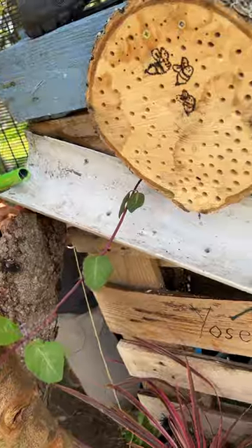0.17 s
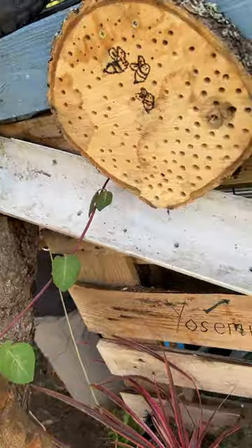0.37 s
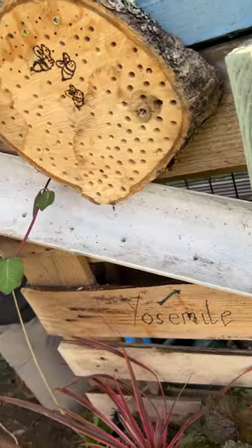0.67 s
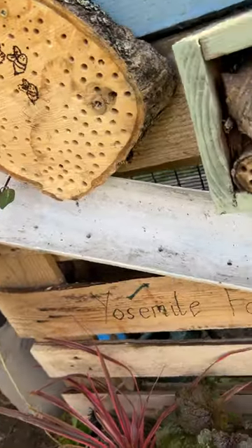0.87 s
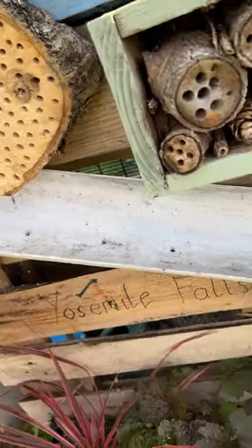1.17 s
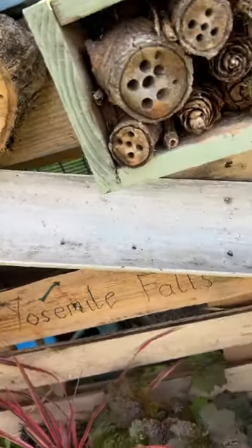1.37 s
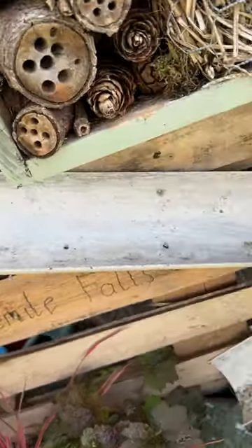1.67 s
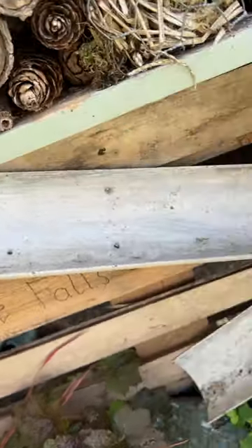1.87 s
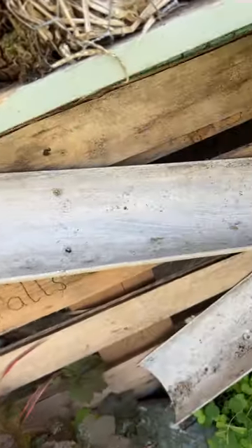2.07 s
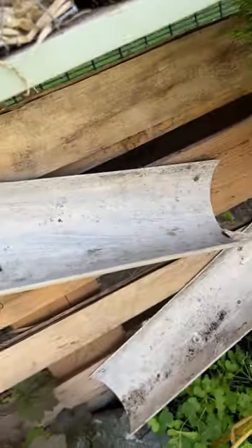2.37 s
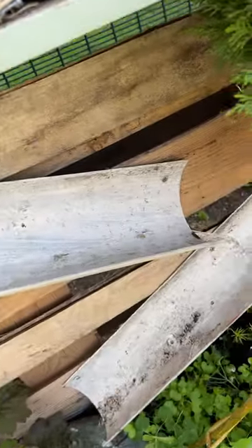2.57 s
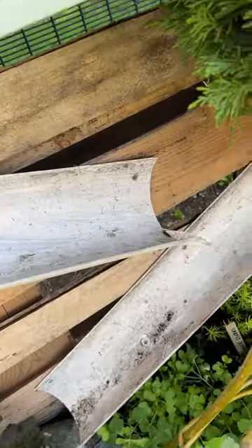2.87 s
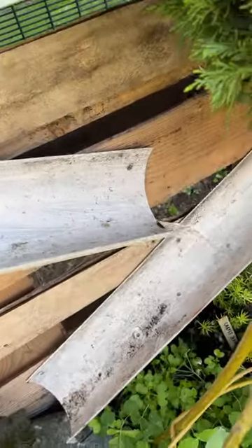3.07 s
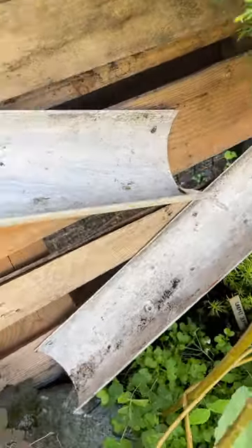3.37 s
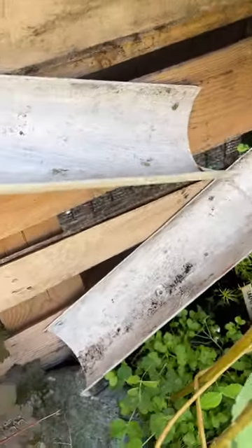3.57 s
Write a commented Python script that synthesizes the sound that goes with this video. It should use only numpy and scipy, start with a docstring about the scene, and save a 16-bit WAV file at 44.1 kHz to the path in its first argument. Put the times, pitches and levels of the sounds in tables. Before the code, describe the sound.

A thin water trickle runs close by along open garden gutters, with crisp high droplets and light gurgling. Drips crowd together around 1 s; a low bubble bloops at 1.75 s, and a stronger wet slap lands at 2.15 s. Soft handling thumps, strongest near 2.3 s, join steady wind rumble and faint outdoor air. Busy plinks around 2.8 s thin after 3.05 s, with very faint bird whistles until 3.5 s.

```python
"""A thin stream runs along half-pipe gutters in a garden and dribbles from one onto the next:
tiny random resonances make its patter and gurgle, dying sines and noise bursts its droplets,
ringing bubbles, slaps and shrinking air pockets. A bird whistles far off with wavering sines.
Wind and the holding hand rumble in the microphone over banded noise of the distant outdoors."""
import sys
import numpy as np
from scipy import signal
from scipy.fft import rfft, irfft, next_fast_len
from scipy.io import wavfile
from scipy.ndimage import uniform_filter1d

SR = 44100
rng = np.random.default_rng(int(sys.argv[2]) if len(sys.argv) > 2 else 0)


def gain_from_decibels(decibels):
    """Convert decibel values to linear amplitude factors."""
    exponent = np.asarray(decibels, float) / 20
    return 10 ** exponent


def digitize_waveform(pressure):
    """Quantize a signal to 16-bit integers and store it at the path in sys.argv[1].

    Rows of a 2-D input are taken as channels; values are limited to [-1, 1].
    """
    field = np.atleast_2d(pressure).T
    bounded = np.clip(field, -1, 1)
    quanta = np.round(bounded * 32767).astype(np.int16)
    wavfile.write(sys.argv[1], SR, quanta)


N = 164493


def rms_one(x):
    """Normalisation: scales a signal to unit root-mean-square."""
    return x / np.sqrt(np.mean(x ** 2) + 1e-20)


def in_time(rows):
    """Linear interpolation: reads (time [s], value) rows at every sample."""
    seconds, values = np.transpose(rows)
    return np.interp(np.arange(N) / SR, seconds, values)


def at_hz(points, hz):
    """Logarithmic frequency scale: reads (frequency [Hz], value) rows between their points."""
    point_hz, values = np.transpose(points)
    return np.interp(np.log(hz), np.log(point_hz), values)


def bandpass(x, low_hz, high_hz, order=2):
    """Band limitation: a Butterworth filter passes one range of frequencies."""
    return signal.sosfilt(signal.butter(order, [low_hz, high_hz], "band", fs=SR, output="sos"), x)


def drift(rate_hz):
    """Low-pass noise: two equal poles at rate_hz leave a slow random curve of rms about 1."""
    step = 40   # samples between the points of the slow curve
    pole = np.exp(-2 * np.pi * rate_hz * step / SR)
    white = rng.standard_normal(N // step + 2002)
    slow = signal.lfilter([1], [1, -2 * pole, pole * pole], white)[2000:]
    return np.interp(np.arange(N) / step, np.arange(len(slow)), rms_one(slow))


def add(out, s, sound, pan_db):
    """Superposition: adds a sound at time s [s], louder on the left by pan_db."""
    start = int(s * SR)
    sides = gain_from_decibels(np.array([[pan_db / 2], [-pan_db / 2]]))
    out[:, start:start + len(sound.T)] += sound.T[:max(N - start, 0)].T * sides


def dying(t, attack_s, t60):
    """Exponential damping: a soft attack, then a fall of 60 dB in t60 [s]; top 1."""
    shape = (1 - np.exp(-t / attack_s)) ** 2 * gain_from_decibels(-60 * t / t60)
    return shape / shape.max()


def chirp(hz, t60, rise, attack_s):
    """Bubble resonance: a damped sine whose pitch climbs near the surface (falls if rise < 0)."""
    t = np.arange(int((t60 + 4 * attack_s) * SR)) / SR
    phase = 2 * np.pi * hz * (t + rise * t * t / t60)
    return dying(t, attack_s, t60) * np.sin(phase)


def gliding_arch(s, length_s, power):
    """Amplitude envelope: a half-sine arch raised to a power; also the progress from 0 to 1."""
    along = np.clip((np.arange(N) / SR - s) / length_s, 0, 1)
    return np.abs(np.sin(np.pi * along)) ** power, along


def banded_noise(spectrum, edges, patchy_db, rate):
    """Spectral shaping: stereo noise bands, each with level, flicker and correlation; rms 1."""
    # correlation of left and right: (frequency [Hz], correlation [-1 to 1])
    likeness = [(40, .992), (90, .994), (160, .97), (300, .7), (600, .1), (1000, .2), (2500, 0),
                (12000, .1)]
    out, together = 0, drift(rate / 2)
    white = rng.standard_normal((2, 2, N))
    for k, (low_hz, high_hz) in enumerate(zip(edges, edges[1:])):
        mid, side = bandpass(white[k % 2], low_hz, high_hz)
        hz = np.sqrt(low_hz * high_hz)
        alike = np.clip(at_hz(likeness, hz), -1, 1)
        flicker_db = patchy_db * (0.21 * together + drift(rate))
        pair = np.sqrt(1 + alike) * mid + np.sqrt(1 - alike) * side * [[1], [-1]]
        out = out + gain_from_decibels(at_hz(spectrum, hz) + flicker_db) * pair
    return rms_one(out)


def grains(per_s, spread_db, cycles, low_hz, high_hz):
    """Impulse excitation: random tiny bubbles ring 48 resonators of spread pitch and side; rms 1."""
    sizes = gain_from_decibels(spread_db * np.minimum(rng.exponential(1, N), 4))
    signs = rng.choice([-1, 1], N)
    impulses = sizes * signs * (rng.random(N) < per_s / SR)
    dealt, out = rng.integers(0, 48, N), np.zeros((2, N))
    for k, hz in enumerate(np.geomspace(low_hz, high_hz, 48)):
        pole = gain_from_decibels(-60 * hz / (cycles * SR))   # falls 60 dB in the given cycles
        w = 2 * np.pi * hz / SR
        share = impulses * (dealt == k) + 1e-18
        rung = signal.lfilter([0, np.sin(w)], [1, -2 * pole * np.cos(w), pole * pole], share)
        add(out, 0, rung, rng.normal(0, 7.5))
    return rms_one(out)


def stream():
    """Sum of many small resonances: fine patter that follows the flow, and a soft gurgle below it."""
    # strength of the flow, scaled below into patter rate and level: (time [s], flow [dB])
    flow = [(0.05, -58), (0.09, -70.5), (0.52, -66), (0.69, -64), (0.95, -92), (1.08, -51), (1.15, -74),
            (1.21, -58), (1.46, -65.5), (1.62, -64), (1.74, -76), (1.91, -66.5), (2.07, -68.5),
            (2.52, -63.5), (2.87, -64.5), (3.04, -75), (3.61, -84.5), (3.73, -67)]
    # course of the soft gurgle, before its gain: (time [s], level [dB])
    gurgle_course = [(0.05, -67), (0.41, -70), (0.84, -72.5), (1.0, -60.5), (1.16, -68.5), (1.3, -63.5),
                     (1.42, -62.5), (1.53, -70), (1.73, -74), (1.98, -68.5), (2.38, -78), (2.55, -65),
                     (2.89, -70.5), (3.02, -74.5), (3.73, -75)]
    patter_gain_db, gurgle_gain_db = -2, -0.5
    flow_db = in_time(flow)
    mean_db = flow_db.mean()
    per_s = 600 * gain_from_decibels(0.5 * (flow_db - mean_db))
    patter = grains(per_s, spread_db=4, cycles=33, low_hz=3300, high_hz=15900)
    gurgle = grains(380, spread_db=3, cycles=45, low_hz=1040, high_hz=3600)
    patter_db = patter_gain_db + 0.72 * flow_db + 0.32 * mean_db
    return gain_from_decibels(patter_db) * patter + gain_from_decibels(gurgle_gain_db + in_time(gurgle_course)) * gurgle


def outdoor_air():
    """Diffuse field: distant outdoor noise, flickering band by band."""
    # relative spectrum of the outdoor noise: (frequency [Hz], density [dB per Hz])
    air_spectrum = [(88, -31), (150, -4.5), (414, -9), (979, -13), (1450, -23.5), (2220, -21.5),
                    (2700, -27.5), (3350, -27), (6020, -34.5), (12400, -45.5), (16000, -44)]
    air_db, left_db = -59, 1   # rms level; left over right
    sides = gain_from_decibels(air_db + left_db / 2 * np.array([[1], [-1]]))
    edges = 150 * 2 ** np.arange(0, 6.8, 0.45)
    return sides * banded_noise(air_spectrum, edges, patchy_db=1.82, rate=11.7)


def rumble():
    """Low-frequency pressure and handling noise: wind in gusts, soft thumps from the hand."""
    # rumble of the wind: (time [s], level [dB])
    gusts = [(0.05, -53), (0.61, -47), (1.4, -51), (1.49, -46), (1.53, -50), (2.29, -50), (2.31, -47),
             (2.48, -50), (3.15, -51.5), (3.28, -42.5), (3.33, -52.5), (3.68, -51.5), (3.73, -52.5)]
    # relative spectrum of the rumble: (frequency [Hz], density [dB per Hz])
    rumble_spectrum = [(12, -49), (20, -35), (36, -4), (59, 3.5), (128, -3.5), (150, -12.5), (226, -16.5),
                       (262, -31), (300, -33), (390, -50), (660, -120)]
    # grip shifts, before the thump gain: (time [s], peak level [dB], starting pitch [Hz])
    grip_shifts = [(1.069, -41, 279), (1.119, -37, 55.7), (1.473, -34, 56.7), (2.312, -23.5, 66.6),
                   (2.386, -30.5, 74), (2.83, -34.5, 64), (3.058, -38.5, 59.5), (3.23, -29.5, 60.7),
                   (3.264, -34, 62.5), (3.645, -36.5, 70.6)]
    attack_cycles, decay_cycles, thump_gain_db = 0.76, 3.94, -3.5
    edges = 20 * 2 ** np.arange(0, 4.1, 0.4)
    out = gain_from_decibels(in_time(gusts)) * banded_noise(rumble_spectrum, edges, patchy_db=0.5, rate=1.5)
    for s, db, hz in grip_shifts:
        thump = chirp(hz, decay_cycles / hz, -0.069, attack_cycles / hz)
        add(out, s, -gain_from_decibels(db + thump_gain_db) * thump, 0)
    return out


def glides():
    """Cavity resonance: air pockets that shrink while they ring, as fluttering rising tones."""
    # shrinking pockets: (time [s], length [s], from [Hz], to [Hz], level before flutter [dB])
    pockets = [(.062, .07, 1270, 2250, -64), (1.729, .017, 870, 1030, -56), (1.746, .026, 1130, 1330, -53),
               (3.29, .014, 2900, 5200, -57)]
    out, flutter = np.zeros((2, N)), gain_from_decibels(3.5 * drift(70.0))
    for s, length_s, from_hz, to_hz, db in pockets:
        arch, along = gliding_arch(s, length_s, 0.32)
        hz = from_hz * (to_hz / from_hz) ** along
        out += gain_from_decibels(db) * flutter * arch * np.sin(2 * np.pi * np.cumsum(hz) / SR)
    return out


def drops():
    """Impact excitation: each droplet gives a rising ring, a bright splash and a faint scattered tail."""
    # droplets landing, before the gains below:
    # (time [s], peak level [dB], starting ring pitch [Hz], bright splash re peak [dB])
    landings = [(0.0716, -56.5, 6900, 1), (0.0814, -44, 10350, -13), (0.113, -50.5, 5100, -33),
                (0.172, -52.5, 14300, -23), (0.2649, -42.5, 8700, -15), (0.3836, -40.5, 9600, -6),
                (0.387, -43, 4140, -30), (0.4085, -36, 8370, -36), (0.4144, -45, 9300, -26),
                (0.49, -48.5, 6470, -27.0), (0.5225, -54.5, 7000, -6.5), (0.566, -42, 15000, -17),
                (0.5837, -47, 7100, 1), (0.6158, -50, 6800, -7), (0.6387, -49, 5900, -9),
                (0.6557, -43, 7230, -16), (0.7263, -51, 3420, -9), (0.8994, -51.5, 6400, -9),
                (0.9218, -52.5, 6750, -31), (0.9365, -42, 6930.0, -21.0), (0.9602, -41, 13610.0, -10),
                (0.9713, -45, 3490, -32), (0.996, -42, 6630, -11), (1.0284, -40.5, 7000, -20),
                (1.038, -47, 11330.0, -10), (1.053, -43.5, 7200, -10), (1.068, -51, 6400, -15),
                (1.0799, -48, 4550, -20), (1.087, -45, 11500, 2.5), (1.1134, -45, 6540, -30),
                (1.1258, -37.5, 6400, -33), (1.1362, -42.5, 4660, -26), (1.156, -43.5, 7500, -12),
                (1.188, -42, 6900, -15), (1.252, -43.5, 7900, -18), (1.2808, -48, 8700, -11),
                (1.2859, -44, 6400, -24), (1.3028, -48, 6840, -19), (1.3286, -51, 4000, -24),
                (1.398, -48.5, 5900, -30), (1.4482, -42, 6300, -22), (1.454, -47, 15160.0, -18),
                (1.468, -53, 7660, -7), (1.483, -38, 6640, -26), (1.4874, -47.5, 10500, -15),
                (1.5097, -52, 14800, -9), (1.664, -49, 5700, -22), (1.671, -53, 9200, -7),
                (1.6874, -45.5, 4630, -12), (1.6987, -40, 6200, -12.5), (1.7286, -53, 3970, -26.0),
                (1.741, -47, 15330.0, -9), (1.7484, -46.5, 10900, -17), (1.7601, -41.5, 5970, -24),
                (1.808, -52, 6290.0, -11), (1.9648, -48, 3920, -7), (1.9861, -44, 5640, -10.5),
                (2.0032, -38.5, 11160, -10), (2.023, -45.5, 5680.0, -4), (2.031, -49.5, 4160, -3.5),
                (2.1334, -49.0, 5750, -2), (2.1754, -51, 5900, -29), (2.2815, -47.5, 7740, -20),
                (2.305, -50.5, 6760, -5), (2.327, -53, 13910.0, -9), (2.337, -49, 8200, -19),
                (2.343, -43.5, 11600, -19), (2.367, -49, 11500, -9), (2.3761, -39, 11300, -8),
                (2.394, -60, 11670.0, 0), (2.428, -55.5, 6000, -6), (2.4604, -47, 6300, -19),
                (2.497, -39, 8700, -6.5), (2.5104, -49, 4600, -9), (2.5212, -48.5, 5000.0, -21.0),
                (2.5369, -42.0, 4330, -11), (2.5457, -47.5, 13900, -8), (2.588, -54, 11400, -6),
                (2.598, -51, 4870, -14), (2.616, -51.5, 4600, -4), (2.619, -52, 3400, -20),
                (2.6608, -47, 9560.0, -20), (2.691, -50, 9300, -7), (2.713, -49.5, 8200, -16),
                (2.7365, -47, 13700.0, -9), (2.7552, -54, 3480, -1), (2.759, -49.5, 3550, -8),
                (2.766, -41.5, 6900, -8), (2.793, -40, 10900, -12), (2.797, -39, 10590.0, -1),
                (2.803, -40, 4200, -20), (2.814, -50, 6130, -24), (2.8268, -42, 8300, -9),
                (2.854, -42, 13100, -25), (2.8575, -38, 12400.0, -11.5), (2.8663, -41.5, 10100, -12),
                (2.9, -51.5, 9100, -4), (2.938, -44.5, 9300, -4), (2.95, -50, 5270, -20.0),
                (2.9704, -55, 13480.0, -7), (2.9785, -41, 15460.0, -8), (2.992, -45.5, 8900, -12),
                (2.997, -45, 13350.0, -14), (3.0398, -41.5, 5300, -14), (3.1043, -50, 4700, -14),
                (3.158, -62.5, 7000, -3.5), (3.197, -51, 11200, -21), (3.211, -45, 7640, -5),
                (3.2307, -45.5, 5160, -4.5), (3.2959, -53.5, 3660, -36.0), (3.3192, -52.5, 6250, -36),
                (3.355, -67, 14500, -9), (3.371, -60, 7100, -9), (3.417, -54, 10600, -14),
                (3.4252, -40.5, 4660, -14), (3.4435, -53, 3250, -8), (3.464, -58, 8800, -7),
                (3.482, -54, 14300, -10.5), (3.495, -54.5, 5900, -10), (3.499, -51, 15000, -14),
                (3.513, -54, 14500, -8), (3.666, -61.5, 12300, -1), (3.685, -65, 10000, -1),
                (3.7, -48.5, 4500, -28), (3.7056, -47, 8900, -4.5), (3.7168, -42.5, 5400, -12)]
    ring_cycles, ring_rise, ring_attack_s, ring_gain_db = 21.8, 0.027, 0.0004, 4
    splash_t60_s, splash_gain_db, splash_low_hz = 0.0063, 10.5, 5000
    spray_t60_s, spray_db = 0.088, -25.5   # scattered tail after each landing
    colour_db, halo_db = 7.5, -14.5   # spread of colour between splashes; tail near the ring's pitch
    out, t = np.zeros((2, N)), np.arange(int(0.09 * SR)) / SR
    edges = np.geomspace(splash_low_hz, 17000, 6)
    burst_shape = dying(t, 0.00067, splash_t60_s) + gain_from_decibels(spray_db) * dying(t, 0.0057, spray_t60_s)
    halo_shape = dying(t, 0.00022, spray_t60_s)
    for (s, db, hz, splash_db), white in zip(landings, rng.standard_normal((len(landings), 4, len(t)))):
        pan_db, colour = white[2, 0], gain_from_decibels(colour_db * white[2, 1:6])
        ring = chirp(hz, ring_cycles / hz, ring_rise, ring_attack_s)
        add(out, s, gain_from_decibels(db + ring_gain_db) * ring, pan_db)
        burst = (white[0] + 0.41 * white[3] * [[1], [-1]]) * burst_shape
        bands = [g * bandpass(burst, low, high) for g, low, high in zip(colour, edges, edges[1:])]
        splash = sum(bands) / np.sqrt(np.mean(colour ** 2))
        near_ring = bandpass(white[1], 0.6 * hz, 1.41 * hz, order=1)
        halo = gain_from_decibels(halo_db) * rms_one(near_ring) * halo_shape
        add(out, s, gain_from_decibels(db) * (gain_from_decibels(splash_db + splash_gain_db) * splash + halo), pan_db)
    return out


def bubbles():
    """Bubble resonance: larger, lower bubbles of trapped air, each with a short broad knock."""
    # bubbles, before the ring and knock gains: (time [s], peak level [dB], starting pitch [Hz],
    # cycles to die away, at least 5 [count], left over right [dB])
    trapped_air = [(0.0941, -53.5, 1480, 20, -1), (0.111, -58, 3170, 25, 0), (0.148, -62.5, 2700, 40, -3),
                   (0.2954, -54.5, 2240, 25, -4), (0.4943, -49.5, 1320, 14, 4),
                   (0.7241, -54.5, 3500, 46, 2), (0.9707, -64, 3340, 13, 9), (1.004, -56, 2900, 17, -11),
                   (1.0074, -58.5, 1510.0, 24, 4), (1.052, -60.5, 1700, 31, 5),
                   (1.0676, -56, 1940, 16, -2.0), (1.0897, -51, 1730, 20.0, -1),
                   (1.297, -47.5, 2180, 60, 2), (1.3135, -53.5, 1100, 14, 8), (1.3314, -57.5, 1260, 11, 7),
                   (1.4158, -51.5, 1690, 31, -1), (1.427, -67, 1660, 22, 2), (1.634, -54, 1750, 84, 0),
                   (1.661, -49.5, 2980, 20, 3), (1.67, -45, 2500, 10, -2), (1.7239, -56.0, 3170, 20, 11),
                   (1.7433, -41, 1060, 26, 2.5), (1.781, -59, 1220, 20.0, 3.0),
                   (1.9644, -51.5, 3230, 13, -12), (2.0212, -59, 1070, 22, 9), (2.038, -43, 1900, 15, -1),
                   (2.063, -54.5, 1770.0, 31, -2), (2.0757, -56, 1720, 38, -1.0),
                   (2.1495, -36.5, 1770, 6.4, -3), (2.164, -56, 2140, 22, -3), (2.1571, -63, 1730, 24, 2),
                   (2.3634, -54.5, 2230, 24, 3.0), (2.377, -58, 1800, 30, -2), (2.399, -54, 2970, 35, 3),
                   (2.412, -50.5, 2260, 15, 0), (2.431, -49.5, 2350, 43, -1), (2.623, -48.5, 2650, 33, -5),
                   (2.633, -53.5, 2530, 22, 8), (2.757, -52, 3400, 28, -6), (2.772, -47, 2990, 39, 5),
                   (2.796, -56, 2080, 24, 4), (2.799, -42.5, 3600, 49, -1), (2.813, -54, 3540, 22, -1.0),
                   (2.865, -60.5, 1650, 59, -2), (2.881, -60, 2380, 47, 3), (2.9, -51.5, 1670, 73, -1),
                   (2.9952, -45.5, 2170, 19, 6), (3.0047, -47.5, 2330, 13, -2),
                   (3.037, -44.5, 2770, 10, 1.0), (3.058, -64, 2550, 23, 1), (3.245, -46, 2160, 28, 1),
                   (3.2942, -42.5, 3000, 11, 2.5), (3.6676, -44, 1820, 26, 2), (3.6766, -53, 1920, 21, 0)]
    rise, attack_cycles, ring_gain_db = 0.077, 1.9, 3.5
    knock_db, knock_t60_s = -9, 0.038   # the gutter wall, struck as a bubble forms
    out, t = np.zeros((2, N)), np.arange(int(0.043 * SR)) / SR
    noises = rng.standard_normal((len(trapped_air), len(t)))
    for (s, db, hz, cycles, pan_db), white in zip(trapped_air, noises):
        ring = chirp(hz, max(cycles, 5) / hz, rise, attack_cycles / hz)
        add(out, s, gain_from_decibels(db + ring_gain_db) * ring, pan_db)
        knock = rms_one(bandpass(white, 0.75 * hz, 1.5 * hz)) * dying(t, 0.00038, knock_t60_s)
        add(out, s, gain_from_decibels(db + knock_db) * knock, pan_db)
    return out


def slaps():
    """Broadband impact: heavy drops slap the water film with a wet crack, then a lumpy narrower tail."""
    # slaps: (time [s], level [dB], low edge of crack [Hz], high edge of crack [Hz])
    heavy_drops = [(0.2949, -50.5, 450, 3700), (0.4949, -47.5, 500, 3460), (2.148, -45, 870, 4400),
                   (2.195, -56, 1200, 3530), (2.4275, -49.5, 1000, 4250), (2.5358, -51.5, 800, 3600),
                   (2.898, -53.5, 800, 3800), (3.0341, -49.5, 1820, 3700)]
    crack_t60_s, tail_db, tail_t60_s, apart = 0.011, -10, 0.13, 0.89
    out, t = np.zeros((2, N)), np.arange(int(0.07 * SR)) / SR
    noises = rng.standard_normal((len(heavy_drops), 4, len(t)))
    for (s, db, low_hz, high_hz), white in zip(heavy_drops, noises):
        pair = white[0] + apart * white[1] * [[1], [-1]]
        crack = rms_one(bandpass(pair, low_hz, high_hz)) * dying(t, 0.00033, crack_t60_s)
        # the same noise, reversed in time and side, serves the tail
        tail = bandpass(pair[::-1, ::-1], 1.3 * low_hz, 0.7 * high_hz)
        lumps = gain_from_decibels(6.7 * rms_one(uniform_filter1d(white[2], size=90)))
        tail = rms_one(tail * lumps) * dying(t, 0.002, tail_t60_s)
        add(out, s, gain_from_decibels(db) * (crack + gain_from_decibels(tail_db) * tail), white[3, 0])
    return out


def bird():
    """Frequency and amplitude modulation: thin, nearly level whistles that waver a little."""
    # far bird: (time [s], length [s], mean pitch [Hz], level before flutter [dB])
    whistles = [(3.08, .045, 2000, -72), (3.1, .02, 2370, -63), (3.185, .1, 3120, -67),
                (3.32, .05, 3170, -71), (3.38, .04, 3400, -73), (3.45, .07, 2230, -72)]
    out = np.zeros((2, N))
    waver, flutter = 1 + 0.01 * drift(25.0), gain_from_decibels(4 * drift(60.0))
    for s, length_s, hz, db in whistles:
        arch, _ = gliding_arch(s, length_s, 0.5)
        out += gain_from_decibels(db) * flutter * arch * np.sin(2 * np.pi * hz * np.cumsum(waver) / SR)
    return out


def echoes(x):
    """Specular reflection: a few close echoes, later on the right and there alternating in sign."""
    # gutter and boards: (delay on the left [s], level re direct sound [dB])
    reflections = [(.0011, -20), (.0025, -11.5), (.0047, -11.5), (.0083, -15.5)]
    out = x.copy()
    for k, (s, db) in enumerate(reflections):
        for side, stretch in enumerate((1, 1.3)):
            lag = int(s * stretch * SR)
            out[side, lag:] += gain_from_decibels(db) * (-1) ** (k * side) * x[side, :-lag]
    return out


def microphone_ports(x):
    """Interaural-like phase difference: two ports receive each frequency at different phases."""
    # phase between the ports: (frequency [Hz], lead of left over right [radians])
    port_phase = [(300, -2.5), (3400, 0.82), (5000, -1.43), (7000, -0.97), (12000, -1.4), (16000, -2)]
    size = next_fast_len(N + 4096)
    spectrum = rfft(x, size)
    hz = np.maximum(np.arange(spectrum.shape[1]) * SR / size, 1)
    half_lead = at_hz(port_phase, hz) / 2
    return irfft(spectrum * np.exp(1j * half_lead * [[1], [-1]]), size)[:, :N]


def scene():
    """Superposition: near water, reflected and seen by two ports, with air, bird and rumble."""
    water = stream() + glides() + drops() + bubbles() + slaps()
    return microphone_ports(echoes(water)) + outdoor_air() + rumble() + bird()


def band_limit(x):
    """A steep low-pass at the top of the band."""
    return signal.sosfilt(signal.butter(12, 16800, fs=SR, output="sos"), x)


def record(dry):
    """Low-pass filtering and gating: the top is cut, and sound fades in after a short silence."""
    start_s, fade_s, stop_hz = 0.032, 0.016, 16900
    fade = np.clip((np.arange(N) / SR - start_s) / fade_s, 0, 1) ** 2
    low_pass = signal.cheby2(10, 60, stop_hz, fs=SR, output="sos")
    mix = fade * signal.sosfilt(low_pass, dry)
    return band_limit(mix)


dry = scene()
out = record(dry)
digitize_waveform(out)
```